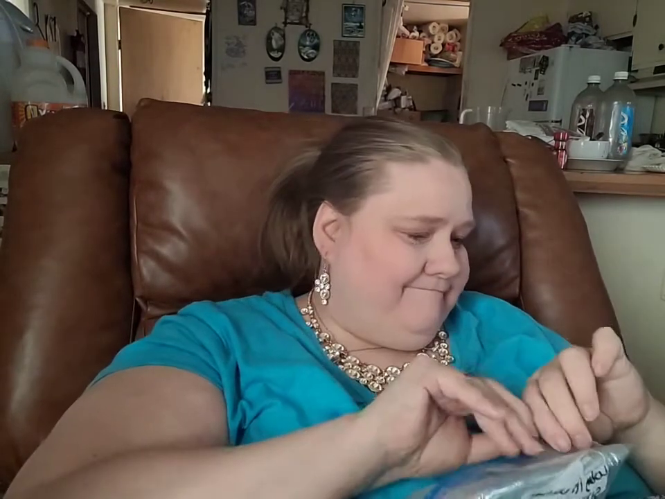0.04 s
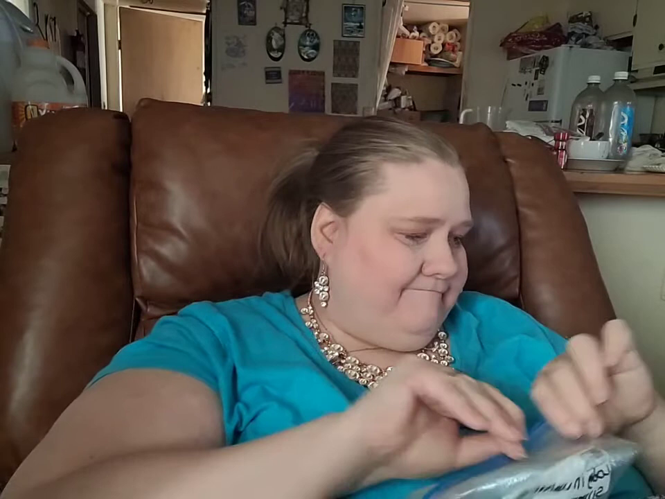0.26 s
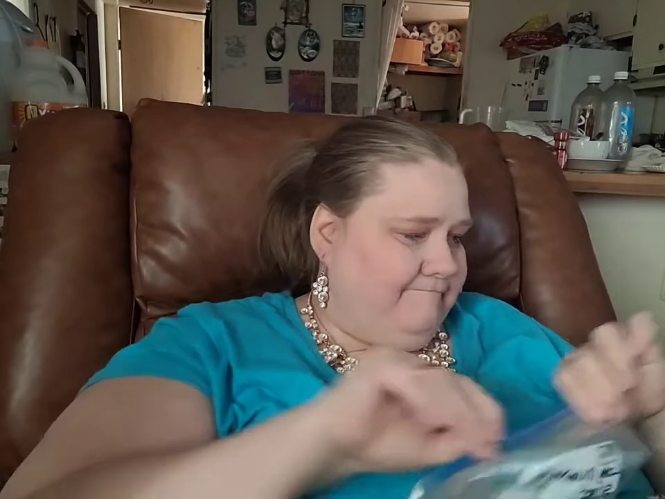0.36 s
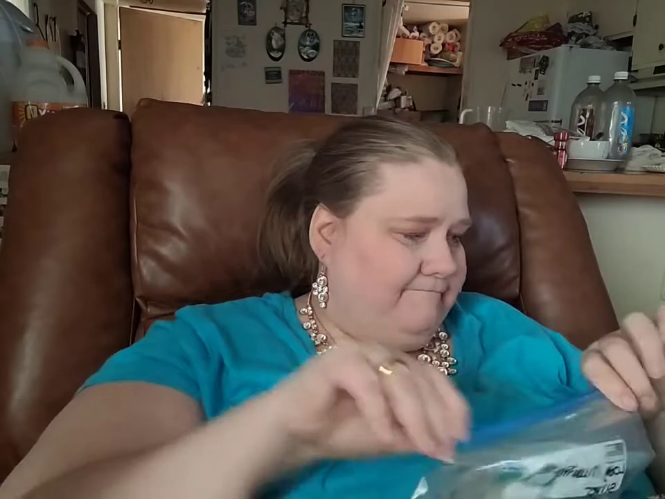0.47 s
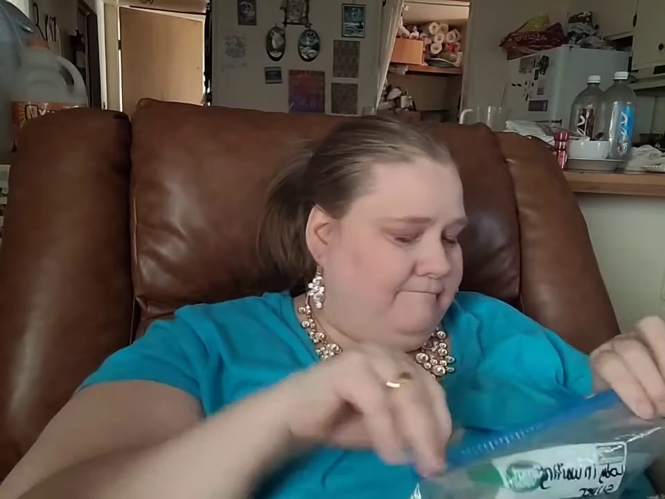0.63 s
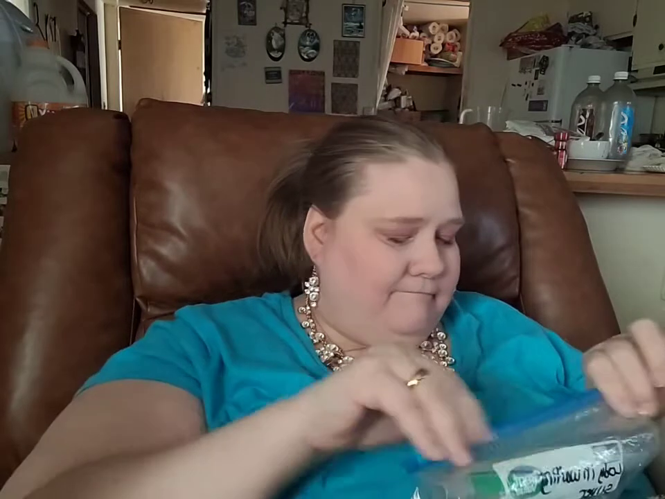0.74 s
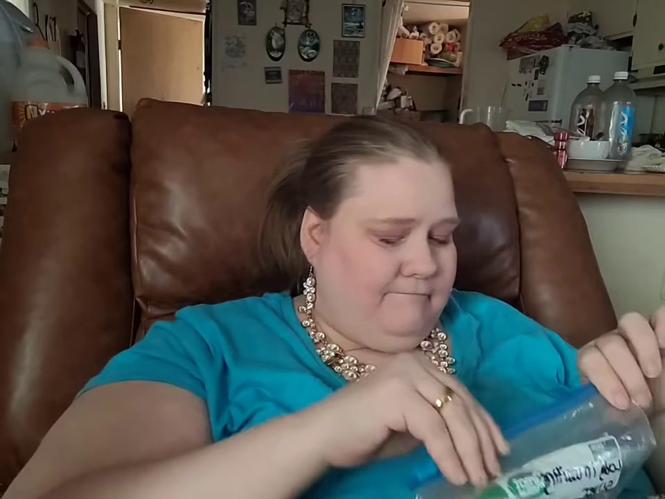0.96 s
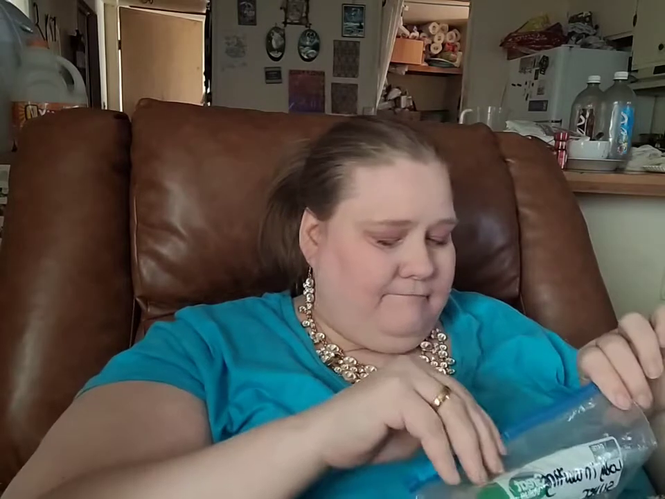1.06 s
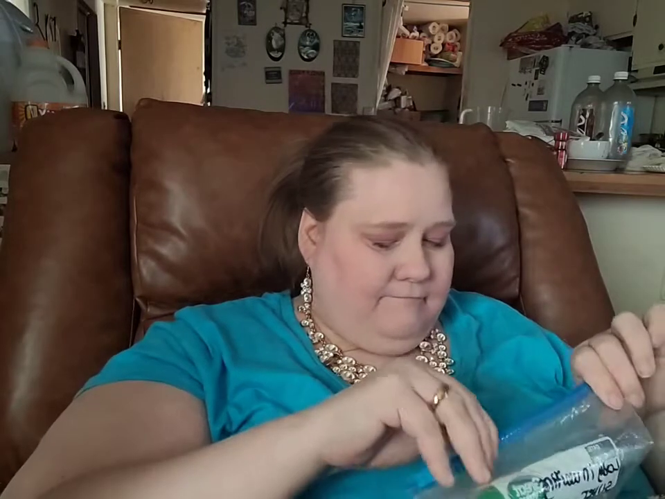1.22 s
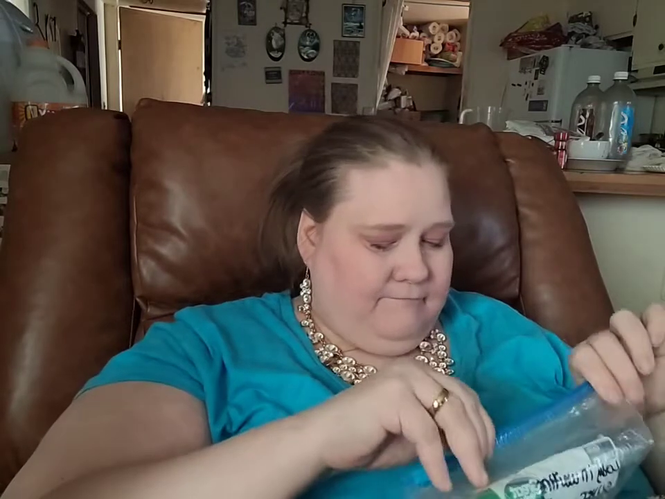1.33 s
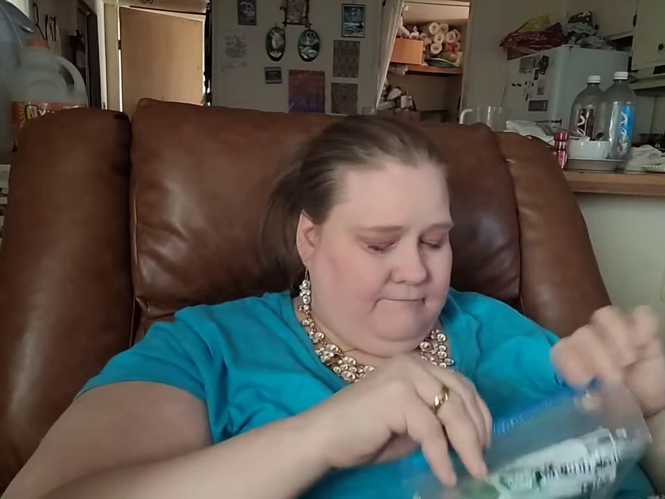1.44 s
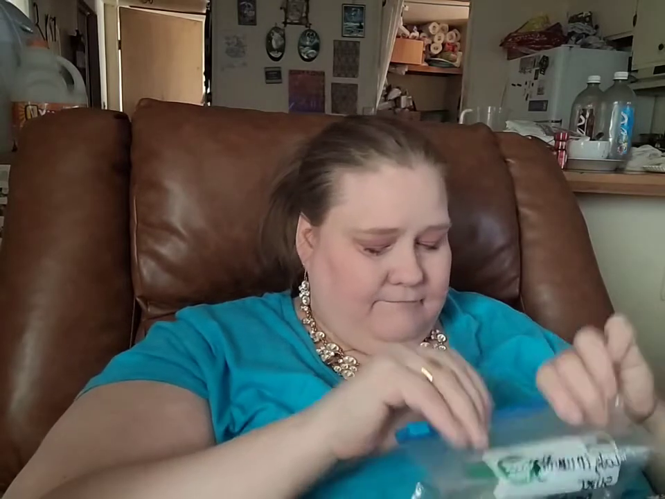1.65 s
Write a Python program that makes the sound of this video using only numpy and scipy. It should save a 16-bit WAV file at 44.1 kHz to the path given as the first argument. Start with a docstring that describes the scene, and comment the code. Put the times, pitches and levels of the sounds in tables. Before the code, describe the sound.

A thin plastic zip bag crackles under rubbing fingers, gets a hollow knock, and its seal snaps apart around half a second; sparser rustles and ticks follow, close to the microphone in a quiet furnished living room.

```python
"""In a quiet living room, a thin plastic zip bag is worked open on a lap.
Fingers rub the film (stick-slip grains over hiss) and creases flick over (short pitched noise ticks).
A hand thumps the bag (decaying sines), the seal snaps apart (a run of noise cracks and a strip ring),
then the open bag is shifted about. Low swells, steady noise and a low hum run underneath."""
import sys
import numpy as np
from scipy import signal
from scipy.fft import rfft, irfft
from scipy.io import wavfile
from scipy.ndimage import uniform_filter1d

SR = 44100
rng = np.random.default_rng(int(sys.argv[2]) if len(sys.argv) > 2 else 0)


def master(y):
    """Save y as 16-bit WAV."""
    cut = np.clip(np.atleast_2d(y).T, -1, 1)
    pcm = np.round(cut * 32767)  # scale
    wavfile.write(sys.argv[1], SR, pcm.astype(np.int16))


N = 74970

BASS_HZ, MIDDLE_HZ, TREBLE_HZ = 176, 1460, 5720  # lower edges of the film's three ranges
TOP_HZ = 13800  # upper limit of the sound


def undb(db):
    """Decibels to gain."""
    return 10 ** (np.asarray(db) / 20)


def unit(x):
    """Scale to rms 1."""
    return x / np.sqrt(np.mean(x ** 2))


def colour(x, points):
    """Minimum-phase filter of unit power through (Hz, relative dB) points."""
    hz, db = np.array(points, float).T
    f = np.fft.rfftfreq(4096, 1 / SR)
    curve_db = np.interp(np.log(f + 1), np.log(hz), db)
    cepstrum = irfft(np.log(unit(undb(curve_db))))
    # folding the cepstrum onto its first half makes the filter causal
    half = len(cepstrum) // 2
    cepstrum[1:half] *= 2
    cepstrum[half + 1:] = 0
    impulse_response = irfft(np.exp(rfft(cepstrum)))
    return signal.fftconvolve(x, impulse_response)[:len(x)]


def walk(rate):
    """Slow random wander of rms 1, from noise averaged twice over 1 / rate seconds."""
    k = int(SR / rate)
    smooth = uniform_filter1d(rng.standard_normal(N), k)
    return unit(uniform_filter1d(smooth, k))


def add(out, start_s, x):
    """Mix a sound in at a time."""
    i = int(np.clip(start_s * SR, 0, N - 1))
    out[i:i + len(x)] += x[:N - i]


def burst(decay_s):
    """A noisy crack with an instant attack, an exponential decay and a set energy."""
    t = np.arange(SR // 10) / SR
    envelope = np.exp(-t / decay_s)
    x = rng.standard_normal(len(t)) * envelope
    return x * np.linalg.norm(envelope) / np.linalg.norm(x)


def ring(modes):
    """Decaying sines of a struck object."""
    t = np.arange(SR // 2) / SR
    out = 0
    for hz, db, t60 in modes:
        decay = np.exp(-np.log(1000) * t / t60)
        out = out + undb(db) * np.sin(2 * np.pi * hz * t) * decay
    return out


def film(ranges):
    """Bass, middle and treble excitations radiated by the thin film."""
    # Tone of the film. Each row: frequency in Hz, relative level in dB.
    film_tone = [(190, -1.5), (300, 0), (1200, 0), (1800, 0), (3200, 1.5), (5800, 0.5), (7600, 3),
                 (8800, -5.5), (11500, -1.5), (13300, -3), (14200, -5.5)]
    edges = [BASS_HZ, MIDDLE_HZ, TREBLE_HZ, SR / 2 - 1]
    out = 0
    for x, lo, hi in zip(ranges, edges, edges[1:]):
        sos = signal.butter(2, [lo, hi], "band", fs=SR, output="sos")
        width_gain = np.sqrt(SR / 2 / (min(hi, TOP_HZ) - lo))  # makes up for the narrower band
        out = out + signal.sosfilt(sos, x) * width_gain
    return colour(out, film_tone)


def room_tone(t):
    """Still air as coloured noise, and the slightly wavering hum of a household appliance."""
    # Partials of the hum. Each row: frequency in Hz, mean rms level in dB.
    hum_partials = [(60, -63), (91, -76), (143.7, -64.5)]
    # Tone of the still air. Each row: frequency in Hz, relative level in dB.
    air_tone = [(20, -1), (45, 4.5), (110, 6), (195, -11), (290, 4.5), (600, -10), (1000, -8),
                (2000, -20.5), (5000, -23), (14000, -28)]
    air_db = -61
    hum = 0
    for hz, db in hum_partials:
        level = undb(db + 1.1 * walk(24))
        hum = hum + level * np.sqrt(2) * np.sin(2 * np.pi * (hz * t + rng.random()))
    return hum + undb(air_db) * colour(rng.standard_normal(N), air_tone)


def arms(t):
    """Deep swells of rumble as the arms shift: one low sine of wavering pitch."""
    # Bell-shaped swells. Each row: centre in seconds, half length in seconds, rms level at the peak in dB.
    swells = [(.01, 0.019, -50.5), (0.172, 0.022, -56), (.958, 0.018, -53), (1.368, 0.052, -52),
              (1.597, 0.022, -52.5)]
    swell_hz = 61  # mean pitch
    level = sum(undb(db) * np.exp(-((t - at) / width) ** 2 / 2) for at, width, db in swells)
    pitch = swell_hz * (1 + 0.056 * walk(25))
    return level * np.sqrt(2) * np.sin(2 * np.pi * np.cumsum(pitch) / SR)


def thump():
    """A hand knocks the bag: one puff of the air inside, then a short hollow ring."""
    # Hand knocks on the bag. Each row: start in seconds, level in dB.
    knocks = [(0.43, -0.5), (1.0035, -14.5), (1.2395, -21), (1.576, -15), (1.591, -12.5)]
    # Ring of the air-filled bag. Each row: frequency in Hz, level in dB, time to fall 60 dB in seconds.
    bag_modes = [(250, -51.5, 0.073), (340, -41.5, 0.058), (438, -37.5, .03), (526, -40.5, 0.033),
                 (624, -35.5, .055), (879, -28, 0.027), (1130, -41.5, 0.043)]
    puff = (388, -25.5, 0.004)  # same columns as the ring
    push_s, low_cut_hz = 0.00027, 139  # the push's smoothing time; the low cut is applied twice
    out = np.zeros(N)
    for start, db in knocks:
        add(out, start, undb(db) * ring(bag_modes + [puff]))
    keep = np.exp(-1 / (push_s * SR))
    softened = signal.lfilter([1 - keep], [1, -keep], out)
    low_cut = signal.butter(2, low_cut_hz, "high", fs=SR, output="sos")
    return signal.sosfilt(np.vstack([low_cut, low_cut]), softened)


def grains(lo_hz, hi_hz):
    """Tiny wrinkles slipping at random, each with its own size and a few cycles at its own pitch."""
    grains_per_s, spread_db, decay_cycles = 2600, 4.5, 1.32
    t = np.arange(256) / SR
    out = np.zeros(N)
    for when, pitch, size, phase in rng.random((int(grains_per_s * N / SR), 4)):
        # low grains are many and weak, so the spectrum stays even
        hz = lo_hz + pitch ** 2 * (hi_hz - lo_hz)
        size_db = spread_db * min(-np.log(1 - size), 5)  # mostly small, a few large
        gain = undb(size_db) * np.sqrt(hz * np.sqrt(hz))
        grain = np.sin(2 * np.pi * (hz * t + phase)) * np.exp(-t * hz / decay_cycles)
        add(out, when * N / SR, gain * grain)
    return unit(out)


def rubbing(t):
    """Dense stick-slip grains over a fine hiss; the grip wavers within each stroke."""
    # Fingers and film sliding. Each row: start, attack, hold and release time constant in seconds,
    # then bass, middle and treble drive in dB.
    rubs = [(0, 0.0018, 0.023, 0.077, -71.5, -69, -69), (0.121, .006, 0.027, 0.022, -59, -61, -56),
            (0.168, 0.0087, 0.03, 0.034, -55.5, -55, -53), (0.223, 0.036, 0.062, 0.024, -58.5, -59, -56.5),
            (0.305, 0.012, 0.089, 0.016, -56, -58.5, -57), (0.41, 0.01, 0.018, 0.0061, -46.5, -53.5, -50),
            (0.553, .01, 0.035, .03, -51, -47.5, -49), (0.6, 0.0096, 0.015, 0.03, -44, -45, -45),
            (0.72, 0.0049, 0.0051, 0.11, -59.5, -60.5, -59),
            (0.862, 0.018, 0.079, 0.089, -64, -71.5, -66.5), (1.13, 0.0034, 0.029, 0.027, -62, -62.5, -54),
            (1.195, .04, 0.059, 0.033, -73, -67.5, -63.5),
            (1.277, 0.031, 0.015, 0.014, -61.5, -57.5, -53.5),
            (1.314, 0.044, 0.053, 0.036, -62.5, -55, -49), (1.426, 0.01, 0.017, 0.044, -58.5, -62.5, -73),
            (1.57, 0.015, 0.033, 0.011, -54.5, -59, -59.5), (1.64, 0.022, .05, .03, -66, -72.5, -65)]
    hiss_share = 0.35  # of the power
    grip_db, grip_rate_hz = 2.15, 120
    power = np.zeros((3, N))
    for start, attack, hold, release, *levels_db in rubs:
        rise = np.clip((t - start) / attack, 0, 1)
        fall = np.exp(-np.maximum(t - start - attack - hold, 0) / release)
        power += (undb(levels_db)[:, None] * rise * fall) ** 2
    hiss = rng.standard_normal((3, N))
    grip = undb(grip_db * walk(grip_rate_hz))
    slips = grains(BASS_HZ, TOP_HZ) * np.sqrt(2 * TOP_HZ / SR)  # as dense in the band as the hiss
    friction = np.sqrt(1 - hiss_share) * slips + np.sqrt(hiss_share) * hiss
    return film(np.sqrt(power) * grip * friction)


def creases():
    """Each crease buckles with a sharp tick around its own pitch and the film flutters briefly."""
    # Creases flicking over. Each row: start in seconds, relative bass, middle and treble drive in dB,
    # pitch in Hz.
    flicks = [(0.02, -54, -57, -59.5, 11400), (0.1071, -41.5, -38.5, -38, 5440),
              (.127, -66, -68, -43, 7400), (0.1316, -63, -67, -43, 6000), (0.2173, -43, -37.5, -34, 7460),
              (0.2564, -58, -52, -48, 7400), (0.2689, -69, -56, -40.5, 4700), (0.28, -47.5, -45, -49, 7600),
              (.3903, -40.5, -46.5, -40, 1000), (.392, -49, -44, -48, 690), (.427, -41, -43, -37, 4000),
              (0.4314, -60, -44, -52, 11100), (0.4447, -54, -47.5, -53, 4600),
              (.4828, -49.5, -44.5, -44.5, 2200), (0.529, -40, -47, -42.5, 12000),
              (0.572, -61, -60, -32, 5000), (0.6076, -65, -41, -33, 13100), (.80, -78, -60, -51, 8160),
              (0.913, -47, -49, -52, 1300), (1.0036, -51, -46, -47.5, 3330),
              (1.0263, -61, -58, -46.5, 7400), (1.136, -67, -61, -43.5, 7800),
              (1.1414, -55, -63, -41, 8300), (1.1972, -70, -50, -54, 2940),
              (1.2394, -51, -45.5, -45.5, 550), (1.249, -73, -58, -49.5, 7250),
              (1.337, -72, -46, -39, 7800), (1.366, -53, -46, -37.5, 12000),
              (1.3733, -62, -57, -45.5, 6000), (1.388, -62, -53, -44, 8000),
              (1.4062, -74, -44.5, -41, 2680), (1.5975, -42, -41, -40, 6350), (1.604, -60, -63, -50, 11500),
              (1.615, -45.5, -50.5, -65, 3160), (1.6304, -45, -43.5, -40, 7350),
              (1.658, -60, -51.5, -58, 2970)]
    tick_s, flutter_s, flutter_db = 0.00061, 0.0033, -16  # decay times; flutter against the tick
    resonance_peak_db, resonance_octaves, patchy_db = 5, 0.36, 0.3
    drive_db = -0.7  # shared trim
    ranges = np.zeros((3, N))
    hz = np.geomspace(BASS_HZ, TOP_HZ, num=40)
    for start, *levels_db, pitch in flicks:
        tick = burst(tick_s) + undb(flutter_db) * burst(flutter_s)
        octaves_away = np.log2(hz / pitch)
        resonance_db = resonance_peak_db * np.exp(-(octaves_away / resonance_octaves) ** 2 / 2)
        tone_db = resonance_db + patchy_db * rng.standard_normal(len(hz))
        tick = colour(tick, list(zip(hz, tone_db)))
        for out, db in zip(ranges, levels_db):
            add(out, start, 2 * undb(db + drive_db) * tick)
    return film(ranges)


def seal():
    """The seal parts in a quick run of cracks; the strongest one rings the stiff strip."""
    # Ribs of the seal letting go. Each row: start in seconds, level in dB, decay in seconds,
    # treble shelf in dB.
    snaps = [(0.5386, -16.5, 0.00026, 4), (.5403, -25, 0.00066, -5), (0.5437, -20.5, 0.0011, -13),
             (.5452, -22, 0.0022, -8.5), (.5472, -25, 0.0026, -4), (0.5495, -27, .001, -12)]
    # Ring of the stiff strip. Each row: frequency in Hz, relative level in dB, time to fall 60 dB in seconds.
    strip_modes = [(665, -8, .18), (1004, -12.5, 0.09), (1550, -26, 0.16), (1787, -2, 0.22),
                   (1996, -10.5, 0.24), (2015, -4.5, .22), (2385, 0.5, 0.11), (2512, 2.5, 0.11),
                   (2600, -8, 0.17), (2950, 6, 0.067), (4300, -2, 0.12), (4660, -2, 0.16), (5090, -9, 0.17),
                   (6110, -0.5, 0.19)]
    # Tone of the cracks. Each row: frequency in Hz, relative level in dB.
    crack_tone = [(60, -24), (140, -15.5), (500, -5), (1200, -0.5), (2500, -0.5), (3800, -3.5), (5800, -3),
                  (7600, -3.5), (8700, -11.5), (11800, -3.5), (14000, -8)]
    tail_db, tail_s, ring_db = -16, .02, -19  # tail and ring against their crack
    cracks, strip = np.zeros(N), np.zeros(N)
    treble = signal.butter(1, TREBLE_HZ, "high", fs=SR)
    for start, db, decay, bright_db in snaps:
        crack = burst(decay) + undb(tail_db) * burst(tail_s)
        shelf = (undb(bright_db) - 1) * signal.lfilter(*treble, crack)
        add(cracks, start, undb(db) * (crack + shelf))
    strongest = max(snaps, key=lambda snap: undb(snap[1]) ** 2 * snap[2])  # by energy
    start, db = strongest[:2]
    add(strip, start, undb(db + ring_db) * ring(strip_modes))
    return colour(cracks, crack_tone) + strip


def room(x, t):
    """A short diffuse tail from the furnished room: decaying noise after a small gap."""
    t60_s, gap_s, tail_db = 0.39, 0.0049, -8.5
    tail = rng.standard_normal(N) * np.exp(-np.log(1000) * t / t60_s) * (t > gap_s)
    tail = colour(tail, [(200, -4.5), (2500, 2.5), (6000, -3), (14000, 1)])
    tail = tail / np.linalg.norm(tail)
    return x + undb(tail_db) * signal.fftconvolve(x, tail)[:N]


def scene():
    """The bag in the room, over arm rumble and room tone that get no added tail."""
    t = np.arange(N) / SR
    background = room_tone(t) + arms(t)
    bag = thump() + rubbing(t) + creases() + seal()
    return (room(bag, t) + background)[None]


def record(dry):
    """The recorder cuts the top with a steep low-pass."""
    top_cut = signal.ellip(8, .2, 70, TOP_HZ, fs=SR, output="sos")
    return signal.sosfilt(top_cut, dry)


dry = scene()
out = record(dry)
master(out)
```